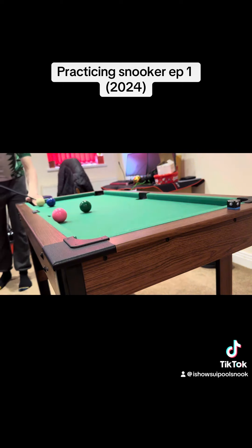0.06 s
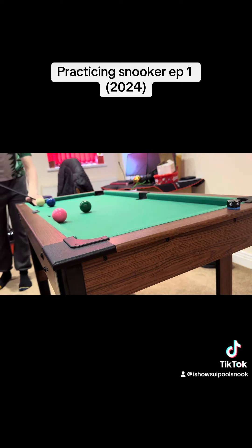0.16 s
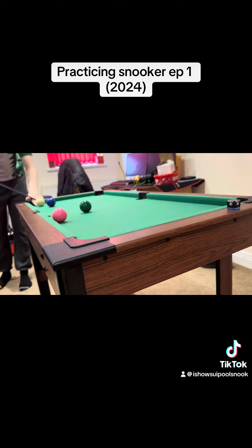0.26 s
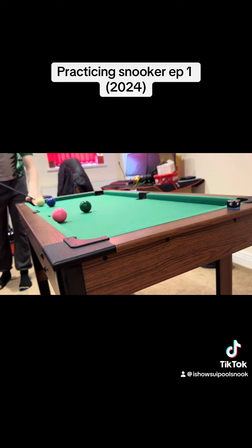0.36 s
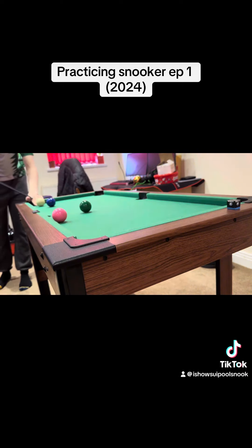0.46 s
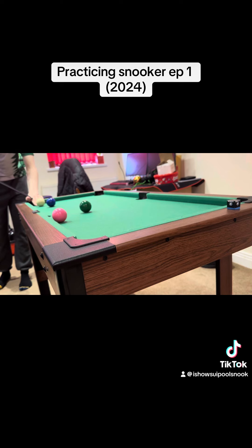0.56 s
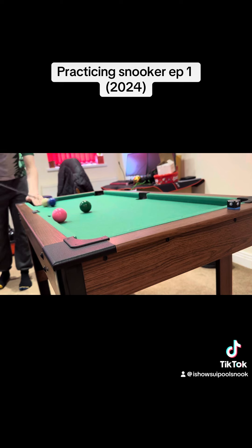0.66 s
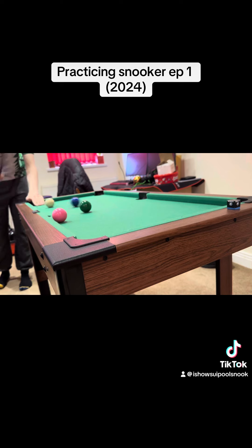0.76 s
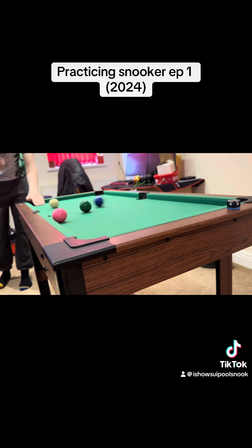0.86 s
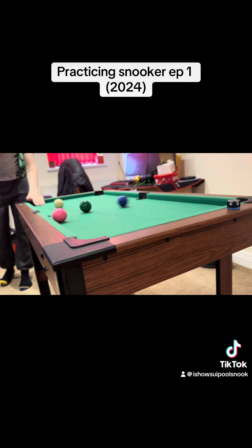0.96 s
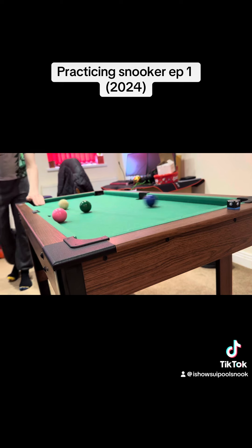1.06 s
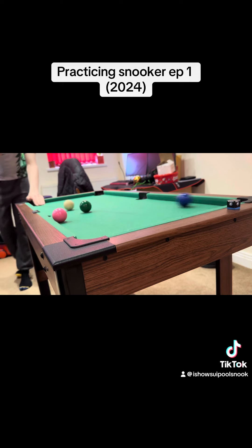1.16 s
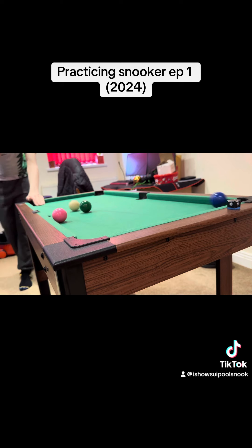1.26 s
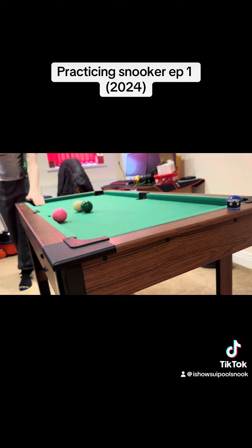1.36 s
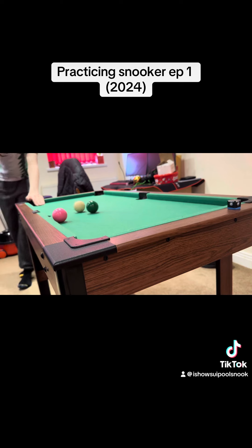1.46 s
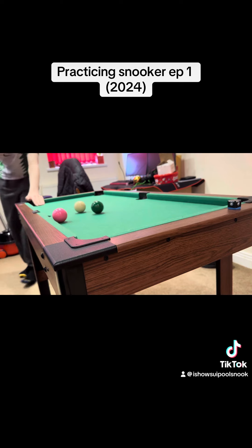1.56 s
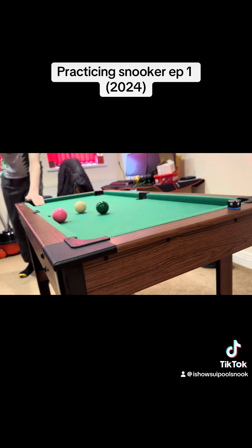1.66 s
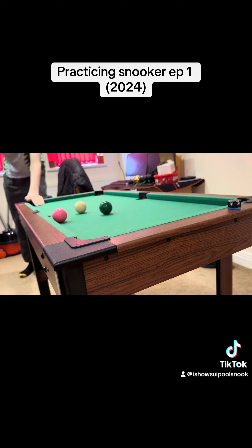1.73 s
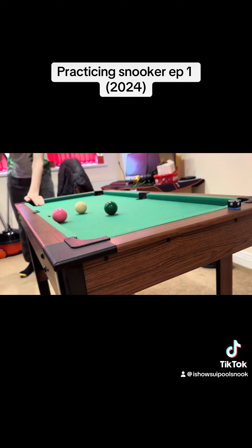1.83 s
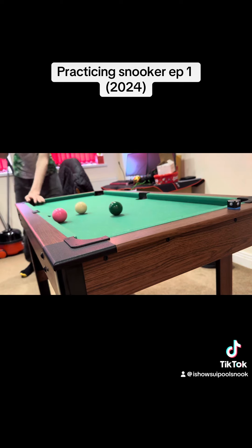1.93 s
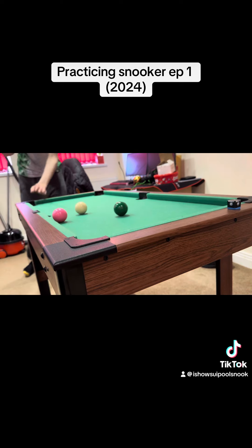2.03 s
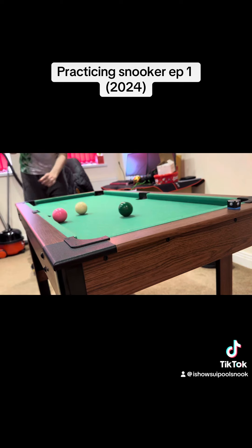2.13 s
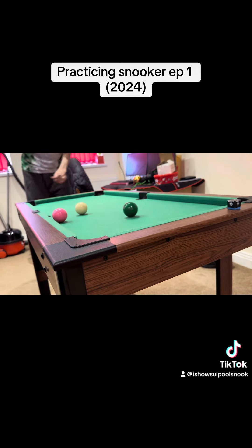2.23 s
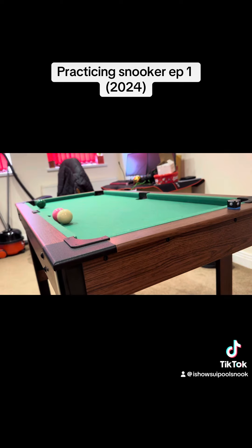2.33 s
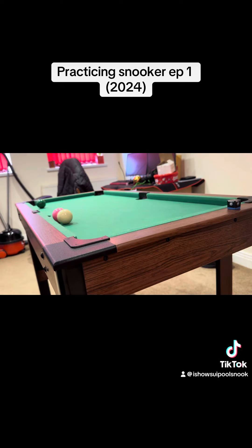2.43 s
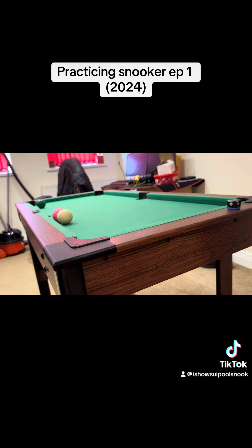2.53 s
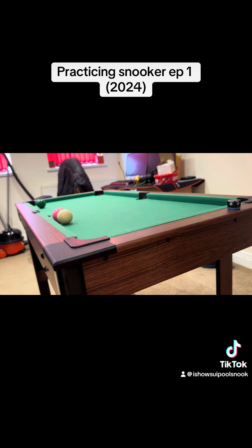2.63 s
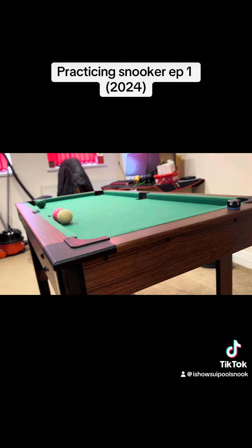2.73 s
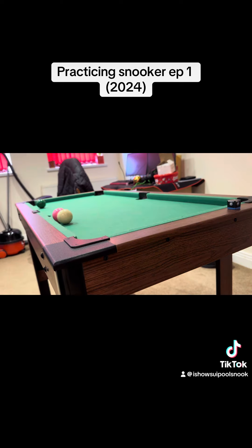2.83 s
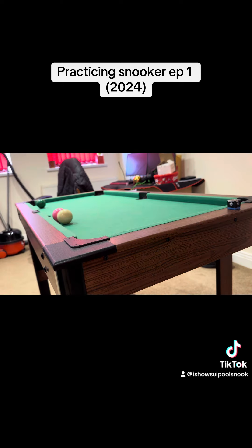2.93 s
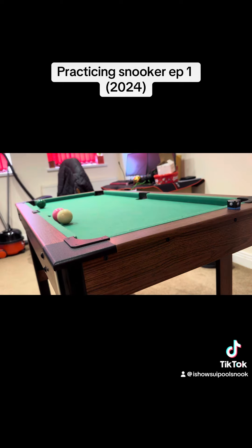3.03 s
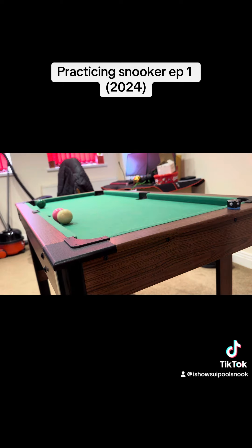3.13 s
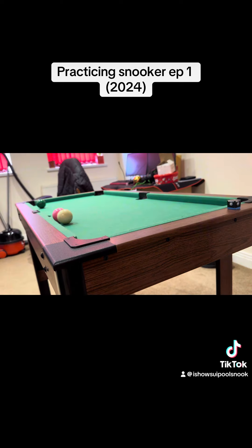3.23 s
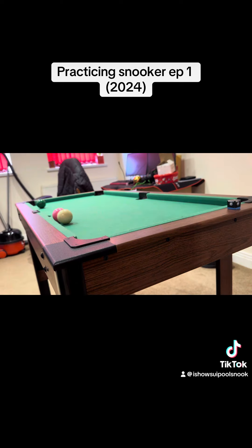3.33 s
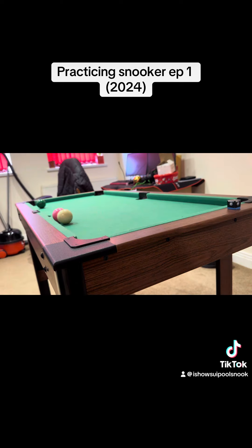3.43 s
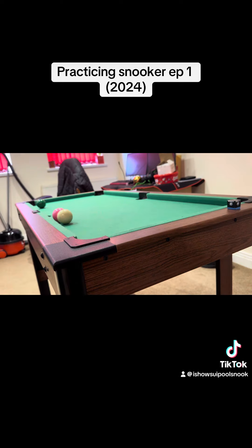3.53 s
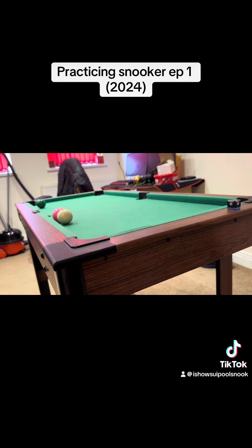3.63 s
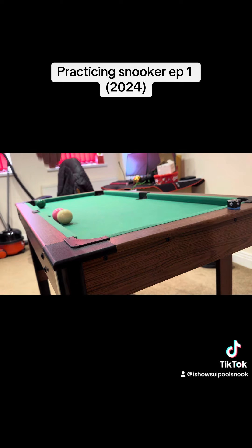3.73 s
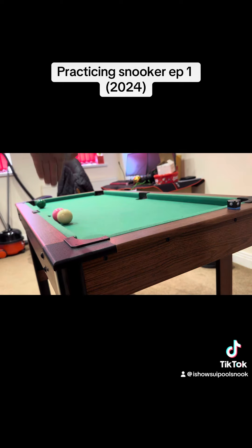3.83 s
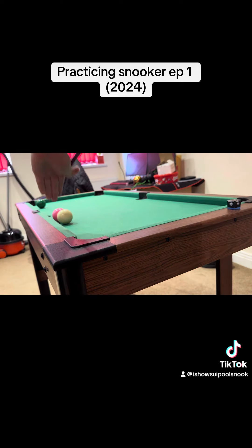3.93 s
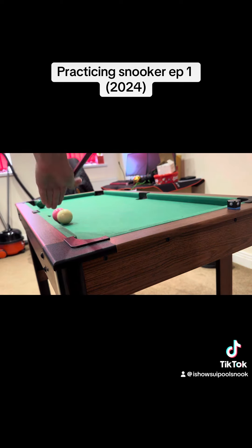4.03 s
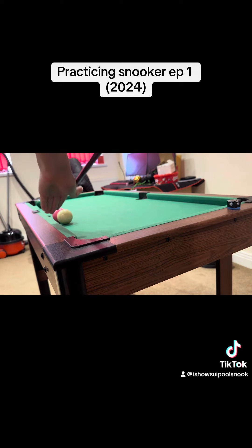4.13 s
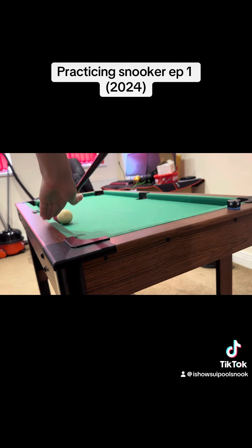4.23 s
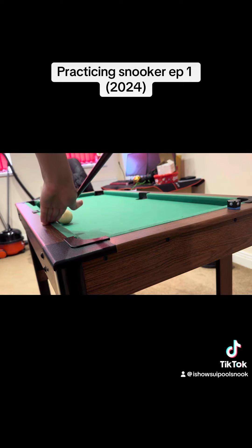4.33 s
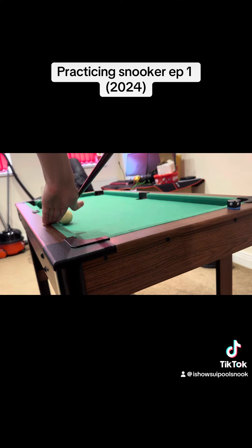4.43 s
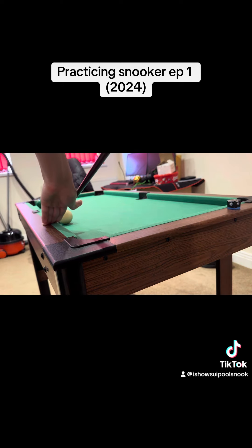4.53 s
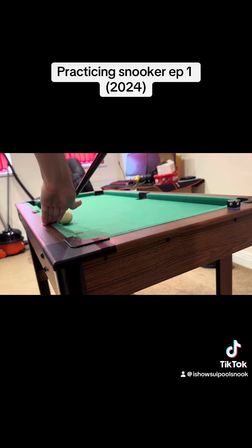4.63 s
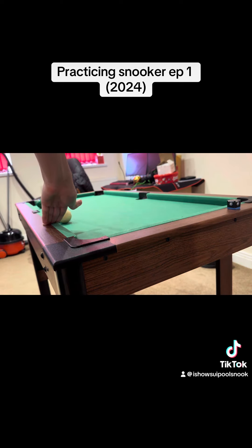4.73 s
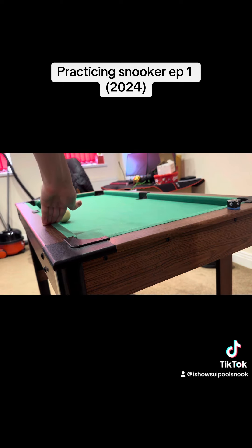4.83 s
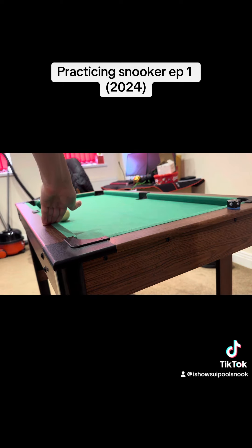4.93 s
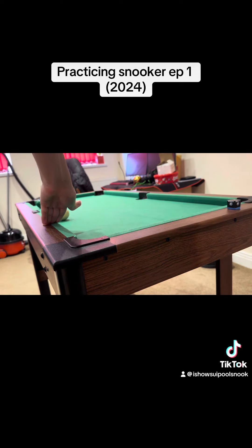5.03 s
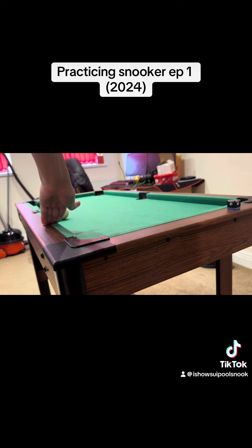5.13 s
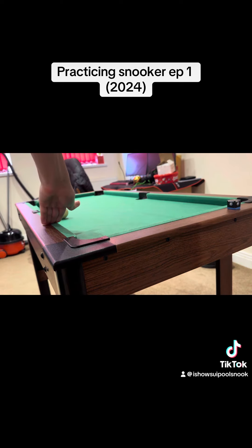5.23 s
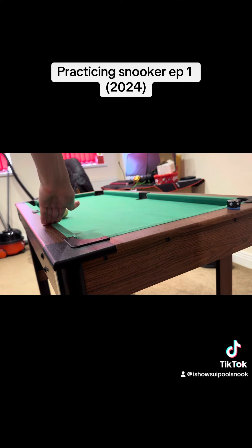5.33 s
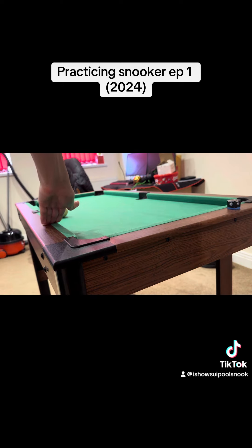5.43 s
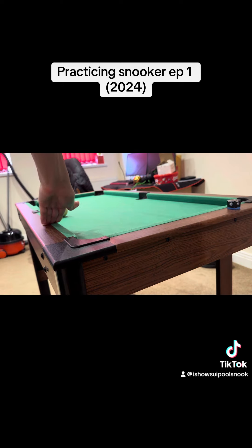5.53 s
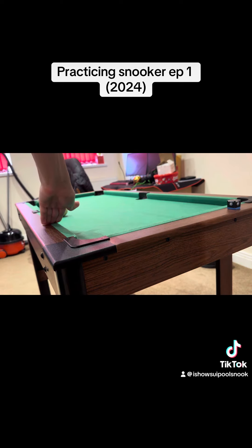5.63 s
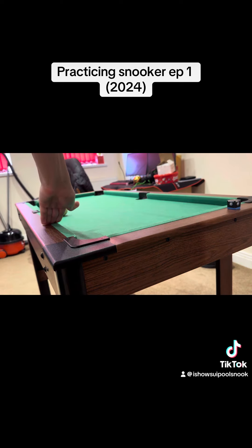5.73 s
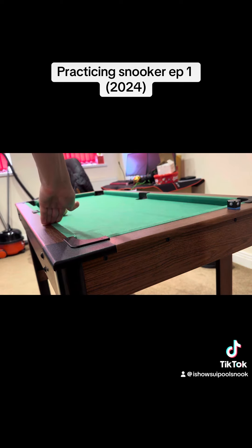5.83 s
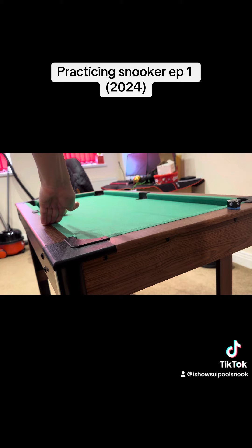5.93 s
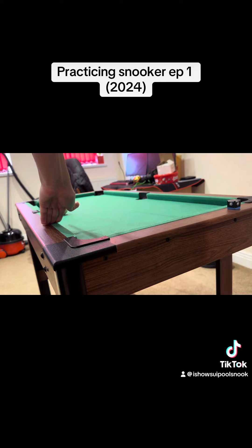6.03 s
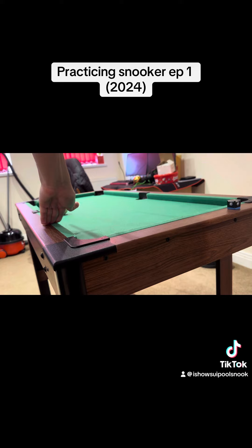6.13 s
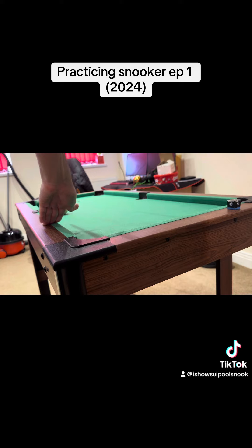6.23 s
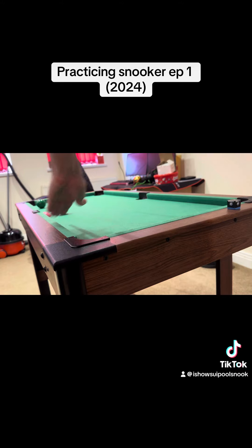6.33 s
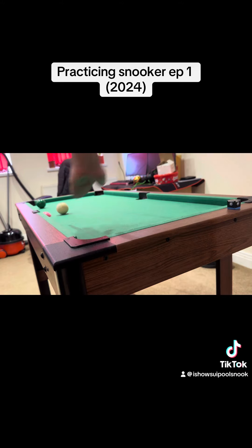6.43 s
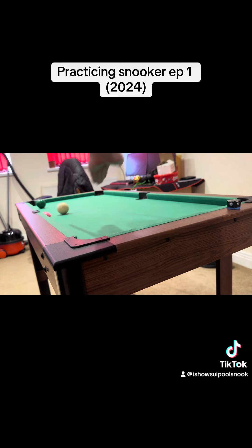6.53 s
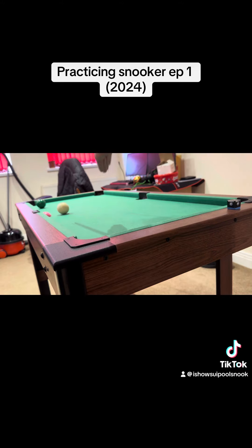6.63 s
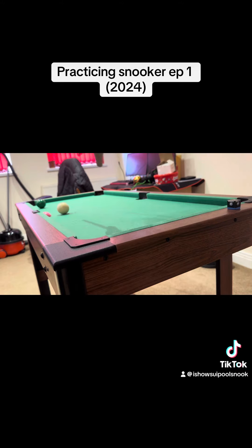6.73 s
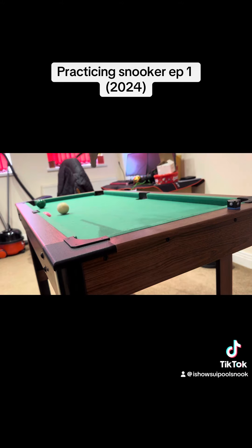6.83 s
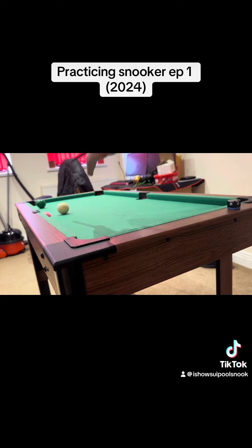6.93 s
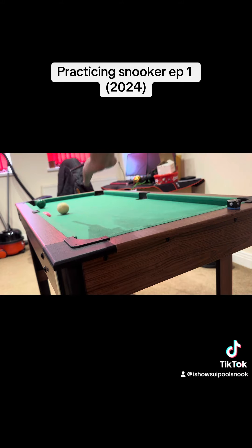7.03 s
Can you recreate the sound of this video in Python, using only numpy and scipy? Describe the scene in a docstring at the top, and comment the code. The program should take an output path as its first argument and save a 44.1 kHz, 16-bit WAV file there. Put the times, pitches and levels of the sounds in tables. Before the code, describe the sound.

A cue strikes and snooker balls clack, roll and rattle into a pocket, followed by a few dull knocks on the wooden table.

```python
"""A carpeted room with a small snooker table, close by and slightly right of a stereo microphone.
The cue strikes, two balls clack, one rumbles over the cloth and rattles into a pocket while the cue
ball kisses another. Blows ring the wooden frame, and the heaviest set the bed booming. The player
steps round the table, reaches in with a swish of sleeve and puts balls down, over a low room hum."""
import sys
import numpy as np
from scipy import signal
from scipy.fft import rfft, irfft
from scipy.io import wavfile

SR = 44100
rng = np.random.default_rng(int(sys.argv[2]) if len(sys.argv) > 2 else 0)


def store_pcm(level_fs):
    """Save levels as 16-bit WAV."""
    pcm = np.round(np.clip(level_fs, -1, 1) * 32767).astype(np.int16)
    wavfile.write(sys.argv[1], SR, np.atleast_2d(pcm).T)


N = 311787
TIME, RING = np.arange(N) / SR, np.arange(SR) / SR  # clocks of the scene and of one blow [s]
DIRECTIONS = 3  # paths from a blow out to the walls


# ball on ball: (time [s], level [dB], pitch [Hz], sharp tip [dB], near rail echo [dB], room [dB])
CLACKS = [(0.6376, -4.5, 2610, -18.5, -10.5, 3.5), (1.3225, -2.5, 2410, -37, -22, -11),
          (1.4389, -23, 2650, -20, -8.5, -2)]

def clacks(near_rail_s=.0012, far_rail_s=.0055, far_rail_db=-20, lead_s=.001):
    """A ball's brief acceleration radiates a wavelet that the rails throw back;
    each clack has its own pitch and sharp tip."""
    def wavelet(hz, tip_db, delay):
        phase = (RING[:SR // 50] - lead_s - delay) * hz * np.pi
        body, tip = ((2 * v ** 2 - 1) * np.exp(-v ** 2) for v in (phase, 2 * phase))
        return body + amp(tip_db) * tip
    for s, db, hz, tip_db, rail_db, room_db in CLACKS:
        paths = [(0, 0), (near_rail_s, rail_db), (far_rail_s, far_rail_db)]
        sound = sum(amp(path_db) * wavelet(hz, tip_db, delay) for delay, path_db in paths)
        sound = edge(sound, 1700, "high", order=2)  # small balls radiate little bass
        yield s - lead_s, amp(db) * sound, room_db


# padded blows of cue tip, cushion and hand:
# (time [s], level [dB], low edge [Hz], high edge [Hz], frame ring [dB], room [dB])
THUDS = [(0.6105, -20, 630, 840, -3.5, -19), (0.6131, -23, 196, 284, -15.5, -17.5),
         (0.6188, -21.5, 600, 760, -14, -14), (0.6364, -32.5, 295, 830, -18.5, 3),
         (1.079, -55.5, 405, 880, -12.5, -6.5), (1.277, -35, 507, 830, -13.5, 5.5),
         (1.2984, -28.5, 340, 920, -12, -1), (1.304, -27.5, 600, 864, -15, -10),
         (1.343, -32.5, 514, 1094, -18, -8), (1.412, -32, 650, 1147, -18, -5),
         (1.669, -48, 416, 825, -11, -4), (4.6231, -32.5, 389, 524, -20.5, -2),
         (4.6256, -29.5, 177, 245, -19.5, -17.5), (5.8732, -26.5, 850, 1140, -18.5, -5.5),
         (5.8802, -26, 540, 855, -16, -11.5), (5.8935, -28.5, 290, 445, -16, -6)]

def thuds():
    """A soft contact gives the wood a dull knock."""
    for s, db, low_hz, high_hz, ring_db, room_db in THUDS:
        yield s, amp(db) * knock(low_hz, high_hz, ring_db), room_db


# ball and cue on wood and pocket jaws, and small knocks nearby:
# (time [s], level [dB], low edge [Hz], high edge [Hz], snap [dB], frame ring [dB], room [dB])
RAPS = [(0.578, -59.5, 785, 5960, -56, -6, 10), (.608, -32, 755, 1610, -47.5, -13.5, 2.5),
        (1.3417, -34, 900, 3700, -26, -27, 0.5), (1.383, -29, 650, 3600, -45, -29, -3.5),
        (1.386, -30, 651, 3800, -45.5, -25, -3.5), (1.4042, -31, 750, 2750, -49, -13.5, -2.5),
        (1.4383, -34.5, 593, 3860, -57, -13, 0), (1.442, -37, 800, 2423, -51.5, -12, -4),
        (1.467, -37.5, 820, 3000, -52, -31, 5.5), (2.027, -62.5, 1520, 2600, -64, -11, -0.5),
        (2.247, -74, 690, 3220, -60.5, -6, 10.5), (4.6188, -41.5, 1368, 2700, -40, -9, -9.5),
        (4.6245, -40, 1500, 2660, -43.5, -8.5, -15.5), (5.863, -47.5, 1207, 3200, -48, -14.5, 5),
        (5.8721, -31.5, 950, 2480, -42, -23.5, 0.5), (5.883, -36.5, 898, 3000, -60, -21.5, -2),
        (5.892, -37, 1000, 2500, -57.5, -21, -13.5)]

def raps():
    """A hard contact gives a brighter knock with a snap on top."""
    for s, db, low_hz, high_hz, snap_db, ring_db, room_db in RAPS:
        yield s, amp(db) * knock(low_hz, high_hz, ring_db) + amp(snap_db) * snap(), room_db


# modes of the wooden rails and panels: (frequency [Hz], level [dB], t60 [s])
FRAME_MODES = [(372, -2, 0.11), (462, -4, 0.17), (658, 1.5, 0.033), (751, 1, 0.042), (874, -6, 0.046),
               (1060, -8.5, 0.045), (1347, -12, 0.17), (1910, -12, 0.075), (2480, -9.5, 0.12),
               (3090, -11.5, 0.043)]

def knock(low_hz, high_hz, ring_db, push_db=-2, crack_t60=.032, skirt_db=-29):
    """Struck wood, one row per direction: a push, a dry crack and the frame's ring."""
    hz, db, t60 = np.transpose(FRAME_MODES)[:, :, None]
    phase, detune = rng.uniform(-1, 1, (2, *hz.shape))  # each spot rings the frame in its own way
    hz = hz * (1 + .012 * detune)
    modes = (amp(db - 60 * RING / t60) * np.sin(np.pi * (2 * hz * RING + phase))).sum(0)
    crack = amp(-60 * RING / crack_t60) * rng.standard_normal((DIRECTIONS, SR))  # countless brief modes
    blow = amp(push_db) * unit(signal.unit_impulse(SR)) + unit(crack)
    blow = edge(unit(blow), 1900, "low", order=1)  # wood gives a little
    ring = edge(unit(modes), low_hz, "high", order=3)  # a stiff spot hardly wakes the lower modes
    wood = edge(blow + amp(ring_db) * ring, low_hz, "high", order=2)
    treble_skirt = amp(skirt_db) * edge(wood, 3300, "low", order=2)
    wood = edge(wood, high_hz, "low", order=4) + treble_skirt  # harder contact, higher edge
    return wood / np.sqrt(np.sum(wood ** 2, axis=1, keepdims=True) / (SR // 100))  # as if 10 ms long


# hard things touching: (time [s], level [dB], room [dB])
TICKS = [(0.61, -46, 18), (.6378, -32, 0), (1.209, -54, -3), (1.298, -37, 4.5), (2.0192, -33.5, 5),
         (2.027, -38, -7.5), (6.8329, -43, -4.5)]

def ticks():
    """A light touch makes only a snap."""
    for s, db, room_db in TICKS:
        yield s, amp(db) * snap(), room_db


# spectrum of a hard contact: (frequency [Hz], level [dB])
SNAP_COLOUR = [(300, -29.5), (1300, -14.5), (3000, -12), (6500, -4.5), (8500, -7.5), (10800, 0),
               (12500, -7), (16000, -11)]

def snap(t60=0.031):
    """One bright impulse with a brief chatter after it."""
    chatter = rng.standard_normal(SR) * amp(-60 * RING / t60)
    contact = unit(signal.unit_impulse(SR)) + .5 * unit(chatter)
    sound = colour(contact[None], SNAP_COLOUR)[0]
    return sound / np.sqrt(np.sum(sound ** 2) / (SR // 1000)) / 2


# modes of the bed under the cloth: (frequency [Hz], level [dB], t60 [s])
BED_MODES = [(52, -18.5, 0.38), (91.5, -19, 0.6), (104, -19, 0.25), (147, -7.5, 0.4), (200.8, 9, 0.34),
             (238.7, 3.5, 0.41), (295.3, -7.5, 0.28), (364, 0, 0.19), (486, -14.5, 0.22)]
# heavy blows: (time [s], level [dB])
BOOMS = [(.624, -20.5), (1.298, -33), (4.635, -32), (5.874, -42)]

def bed_booms(rise_s=.027):
    """After a heavy blow the broad bed swells into a low boom."""
    hz, db, t60 = np.transpose(BED_MODES)[:, :, None]
    modes = (amp(db - 60 * RING / t60) * np.sin(2 * np.pi * hz * RING)).sum(0)
    boom = modes * (1 - np.exp(-RING / rise_s)) ** 2
    out = np.zeros(N)
    for s, level_db in BOOMS:
        add(out, s, amp(level_db) * boom)
    return direct(out)


# runs over the cloth: (start [s], length [s], level [dB], fall [dB/s])
ROLLS = [(0.629, 0.61, -51.5, 1.5), (1.355, 0.75, -56, 27.5), (2.302, 1.6, -77, 0.5)]
# spectrum of the rumble: (frequency [Hz], level [dB])
ROLL_COLOUR = [(30, -23.5), (80, -4), (130, 1), (200, -2), (270, -5.5), (450, -6.5), (750, -16.5),
               (1300, -31), (4000, -53.5), (7000, -44), (15000, -62)]

def rolling(skid_db=8.5, skid_s=0.18):
    """Each ball skids loudly, then rumbles over the bed, quieter as it slows."""
    level = np.zeros(N)
    for s, length, db, fall in ROLLS:
        skid = skid_db * np.exp(-abs(TIME - s) / skid_s)
        level += amp(db + skid) * stroke(s, length, attack=0.019, release=0.048, sag_db_per_s=fall)
    return level * rubbing(ROLL_COLOUR, rough_db=2.5, grain_hz=38.3)


# steps round the table: (time [s], level [dB])
STEPS = [(1.621, -71), (1.951, -58), (2.25, -57.5), (2.699, -59), (2.85, -61.5), (3.07, -65)]

def footsteps(t60=0.34, cutoff_hz=100, rise_s=0.013):
    """Feet land on carpet with soft, low thuds."""
    feet = np.zeros(N)
    onset = 1 - np.exp(-RING / rise_s)
    for s, db in STEPS:
        rumble = edge(rng.standard_normal(SR), cutoff_hz, "low", order=2)
        thud = unit(edge(rumble, 21, "high", order=2))
        add(feet, s, 2 * amp(db - 60 * RING / t60) * onset * thud)
    return direct(feet)


# cloth on cloth as the player moves: (start [s], length [s], rustle [dB], fizz [dB])
SCUFFS = [(1.542, 0.58, -81.5, -88), (2.236, 0.18, -83.5, -79), (2.511, 0.15, -74, -87),
          (2.698, 0.072, -76, -82.5), (2.879, 0.041, -83, -83.5), (3.008, 0.054, -91, -77.5),
          (3.227, 0.035, -84.5, -90), (3.43, 0.069, -84.5, -82.5), (3.63, 0.19, -73.5, -87.5),
          (4.548, 0.07, -100, -83), (6.22, 0.027, -94, -81.5), (6.409, 0.26, -90.5, -85.5),
          (6.79, 0.11, -71, -80.5), (7.001, 0.068, -99.5, -83.5)]
# spectra of folding and of sliding cloth: (frequency [Hz], level [dB])
RUSTLE_COLOUR = [(300, 1), (1000, 5.5), (1600, 4), (3100, 4), (4800, -4), (7000, -6.5), (10000, -18.5),
                 (16000, -30)]
FIZZ_COLOUR = [(2000, -36), (6000, -4.5), (8500, -2), (10800, 8.5), (13000, -3.5), (16000, -15.5)]

def clothes():
    """Clothes rustle as they fold and fizz as they slide."""
    folding, sliding = np.zeros((2, N))
    for s, length, rustle_db, fizz_db in SCUFFS:
        motion = stroke(s, length, attack=0.021, release=0.071)
        folding += amp(rustle_db) * motion
        sliding += amp(fizz_db) * motion
    rustle = folding * rubbing(RUSTLE_COLOUR, rough_db=1.0, grain_hz=67.6)
    fizz = sliding * rubbing(FIZZ_COLOUR, rough_db=1.5, grain_hz=92.0)
    return rustle + fizz


def sleeve(start_s=3.559, length_s=0.53, swish_db=-75, rustle_db=-73, hurry=0.56):
    """The arm sweeps in quickly and slows gently: a swish of cloth, with a rustle at full speed."""
    progress = np.clip((TIME - start_s) / length_s, 0, 1)
    speed = abs(np.sin(np.pi * progress ** hurry))
    centre_hz = np.interp(progress, [0, 1], [2800, 3570])  # rises as the sleeve draws tight
    band = edge(rng.standard_normal((2, N)), 800, "low", order=2)
    swish = unit(band * np.sin(2 * np.pi * np.cumsum(centre_hz) / SR))
    rustle = rubbing(RUSTLE_COLOUR, rough_db=1.0, grain_hz=60)
    return amp(swish_db) * speed ** 1.06 * swish + amp(rustle_db) * speed ** 4 * rustle


# faint creaks: (start [s], length [s], gain [dB], pitch [ratio])
CREAKS = [(2.266, 0.011, 2.5, 1.07), (2.32, 0.078, 2, 1)]
# their partials: (base frequency [Hz], half-width [Hz], level [dB])
CREAK_PARTIALS = [(413.5, 34, -71), (1620, 40, -85), (4070, 190, -85), (5700, 270, -80.5), (6940, 380, -82)]

def creaks():
    """Under the player's weight a few wavering partials sound, at a new pitch each time."""
    out = np.zeros((2, N))
    for s, length, gain_db, pitch in CREAKS:
        tone = np.zeros((2, SR))
        for hz, width_hz, db in CREAK_PARTIALS:
            waver = edge(rng.standard_normal((2, SR)), width_hz, "low", order=2)
            tone += amp(db) * unit(waver * np.sin(2 * np.pi * pitch * hz * RING))
        add(out, s, amp(gain_db) * tone * stroke(0, length, attack=0.0083, release=0.037)[:SR])
    return out


# decay of the carpeted room: (frequency [Hz], t60 [s])
ROOM_T60 = [(100, 0.77), (300, 0.44), (900, 0.49), (2500, 0.45), (5000, 0.33), (11000, 0.25)]
# spectrum of its reflections: (frequency [Hz], level [dB])
ROOM_COLOUR = [(100, 7), (400, -1.5), (1200, -4.5), (3000, -4.5), (6000, -3.5), (12000, -11)]

def room(x, build_s=0.0085, gap_s=0.0026, near_db=-9, near_t60=0.041):
    """Rails and cloth scatter at once; wall reflections thicken, then each band dies at its own speed."""
    hz, t, bands = signal.stft(diffuse(SR), SR, nperseg=256)
    bands = bands * amp(-60 * t / read(ROOM_T60, hz)[:, None])
    tail = signal.istft(bands, SR, nperseg=256)[1][:, :SR]
    tail *= 1 - np.exp(-np.maximum(RING - gap_s, 0) / build_s)
    scatter = diffuse(SR) * amp(-60 * RING / near_t60)
    response = colour((unit(tail) + amp(near_db) * unit(scatter)) / np.sqrt(SR), ROOM_COLOUR)
    return signal.fftconvolve(x[None], response, axes=1)[:, :N]


# room tone all round the microphone: (frequency [Hz], level [dB])
AIR_COLOUR = [(20, -24), (35, -15.5), (50, -0.5), (75, -6), (105, -5), (135, -13.5), (200, -9.5),
              (260, -18), (600, -24.5), (1000, -29.5), (1500, -38), (2400, -38.5), (3000, -45.5),
              (11500, -51.5), (15000, -62)]
# tones of the hum: (frequency [Hz], level [dB])
HUM_TONES = [(97.5, -76.5), (102.5, -72.5), (199.2, -79.5), (602.9, -89.5)]

def room_tone(air_db=-69.5, swell_s=1.6):
    """Low room noise and a beating hum swell, then hold their level."""
    hum = sum(amp(db) * np.sqrt(2) * np.sin(2 * np.pi * (hz * TIME + rng.random()))
              for hz, db in HUM_TONES)
    air = unit(colour(diffuse(N), AIR_COLOUR))
    swell = amp(air_db + np.interp(TIME, [0, swell_s], [-4.5, 0]))
    return hum * np.interp(TIME, [0, 1.], [.35, 1]) + swell * air


# stereo width at the microphone: (frequency [Hz], side over mid [ratio])
SPREAD = [(60, 0.27), (150, 0.32), (300, 0.46), (600, 0.77), (1200, 0.9), (3500, 0.84), (10000, 0.097)]

def diffuse(size):
    """Noise from all sides: widest in the midrange, narrow in the bass and top treble."""
    mid, side = rfft(rng.standard_normal((2, size)))
    width = read(SPREAD, np.fft.rfftfreq(size, 1 / SR))
    return np.array([irfft((mid + sign * width * side) / np.hypot(1, width), size) for sign in (1, -1)])


def direct(x):
    """The table is slightly to the right, so the left side is softer and a sample later."""
    return np.array([amp(-3.5) * np.roll(x, 1), amp(-1.44) * x])


def in_room(hits):
    """Each hit (time [s], sound, room [dB]) reaches the microphone directly and off the walls."""
    near, far = np.zeros(N), np.zeros((DIRECTIONS, N))
    for s, sound, room_db in hits:
        add(near, s, np.atleast_2d(sound)[0])
        add(far, s, amp(room_db) * sound)
    reflections = sum(room(x) for x in far) / np.sqrt(DIRECTIONS)
    return direct(near) + amp([[-.6], [.6]]) * reflections


def rubbing(spectrum, rough_db, grain_hz):
    """Friction noise whose strength flutters with the unevenness of the surfaces."""
    bumps = unit(edge(rng.standard_normal(N), grain_hz, "low", order=2))
    return unit(colour(diffuse(N) * amp(rough_db * bumps), spectrum))


def stroke(start, length, attack, release, sag_db_per_s=0):
    """Gain that rises, holds or sags, and dies away; times in seconds."""
    age = np.maximum(TIME - start, 0)
    fade = np.exp(-np.maximum(age - length, 0) / release)
    return np.minimum(age / attack, 1) * amp(-sag_db_per_s * age) * fade


def colour(x, points, size=2048):
    """Causal filter with the given spectrum."""
    log_gain = np.log(amp(read(points, abs(np.fft.fftfreq(size, 1 / SR)))))
    taps = np.fft.ifft(np.exp(np.conj(signal.hilbert(log_gain)))).real
    return signal.oaconvolve(x, taps[None], axes=1)[:, :x.shape[1]]


def edge(x, hz, kind, order):
    """Butterworth low-pass or high-pass."""
    return signal.sosfilt(signal.butter(order, hz, kind, fs=SR, output="sos"), x)


def amp(db):
    """Decibels to gain."""
    return 10 ** (np.asarray(db) / 20)


def unit(x):
    """Scales to an rms of one."""
    return x / np.sqrt(np.mean(x ** 2) + 1e-20)


def read(points, hz):
    """Reads a curve on a log-frequency axis."""
    f, value = np.transpose(points)
    return np.interp(np.log(hz + 1), np.log(f), value)


def add(mix, s, sound):
    """Adds a sound to the mix at time s."""
    part = mix[..., max(round(s * SR), 0):][..., :sound.shape[-1]]
    part += sound[..., :part.shape[-1]]


def scene():
    """The table close by, the player moving round it, the room behind."""
    table = in_room([*clacks(), *thuds(), *raps(), *ticks()]) + bed_booms() + rolling()
    player = footsteps() + clothes() + sleeve() + creaks()
    return table + player + room_tone()


# left microphone port behind the right: (frequency [Hz], phase lag [rad])
PORT_LAG = [(7000, 0.5), (8000, -7), (9000, -11), (10300, 0.48), (12000, -0.5), (13500, 3.5), (15000, -0.3)]

def record(dry, limit_hz=16300):
    """The microphone's two ports agree in the bass and part in phase in the band-limited treble."""
    size = N + N % 2
    hz = np.fft.rfftfreq(size, 1 / SR)
    lag = read(PORT_LAG, hz) * np.minimum(hz / PORT_LAG[0][0], 1)
    turn = np.exp(-.5j * lag)  # half to each side
    heard = irfft(rfft(dry, size) * np.array([turn, turn.conj()]))[:, :N]
    low_pass = signal.firwin(511, limit_hz, window=("kaiser", 9), fs=SR)
    return signal.oaconvolve(heard, low_pass[None], "same")


dry = scene()
out = record(dry)
store_pcm(out)
```